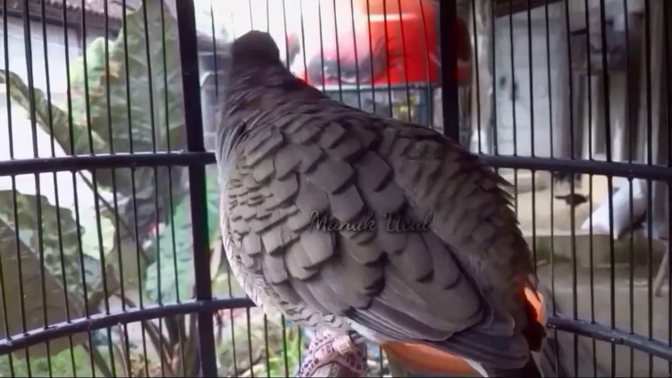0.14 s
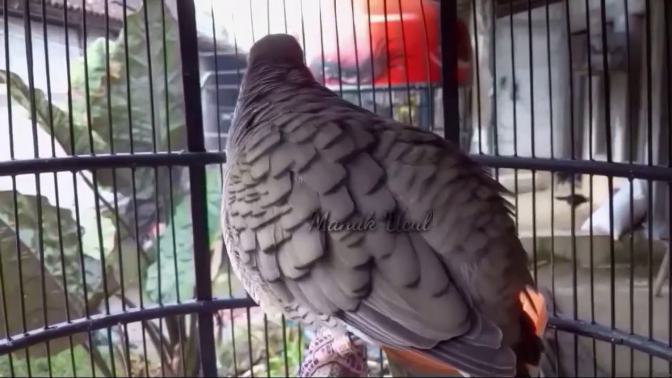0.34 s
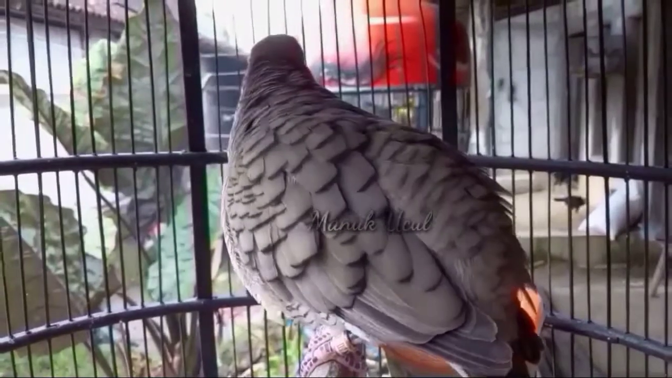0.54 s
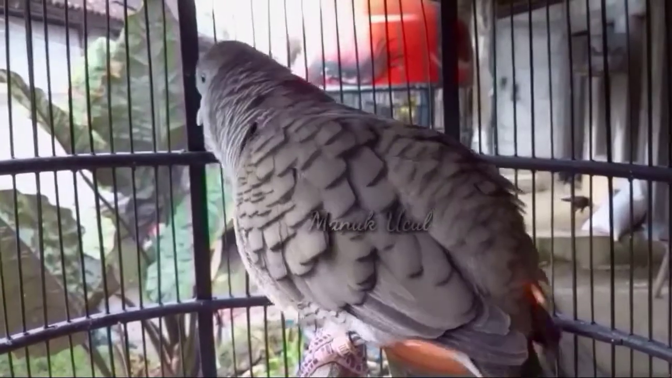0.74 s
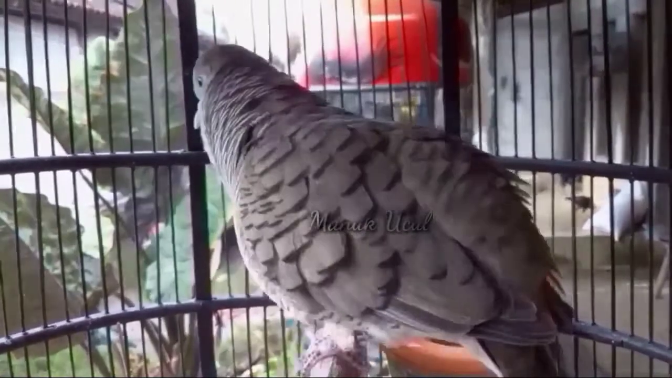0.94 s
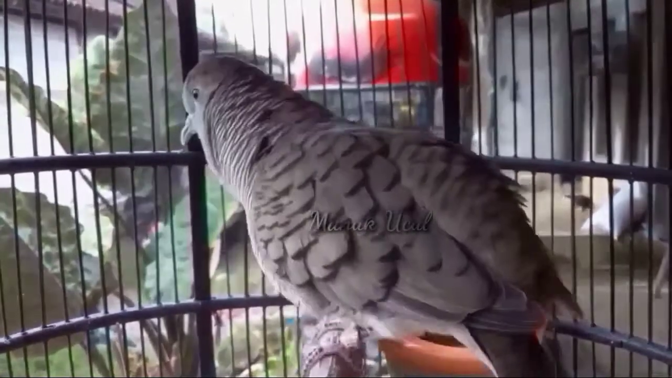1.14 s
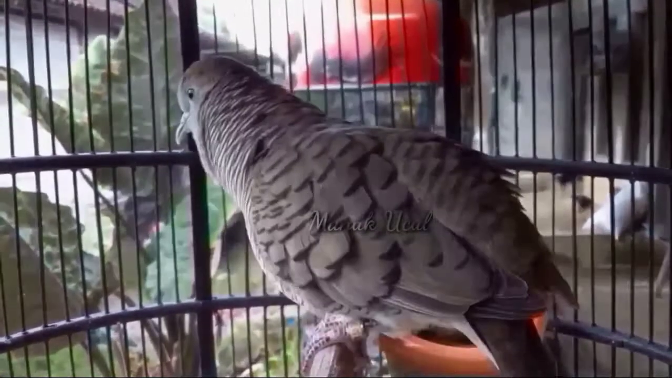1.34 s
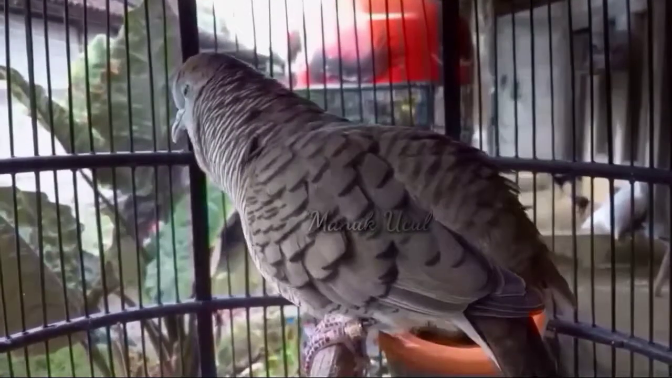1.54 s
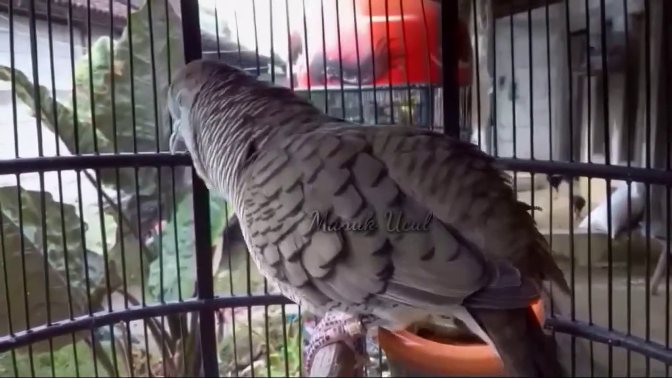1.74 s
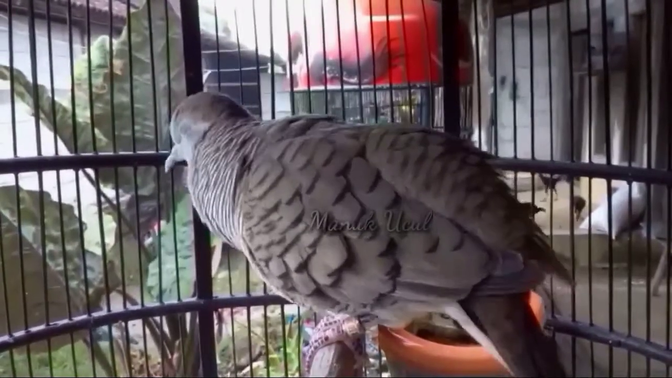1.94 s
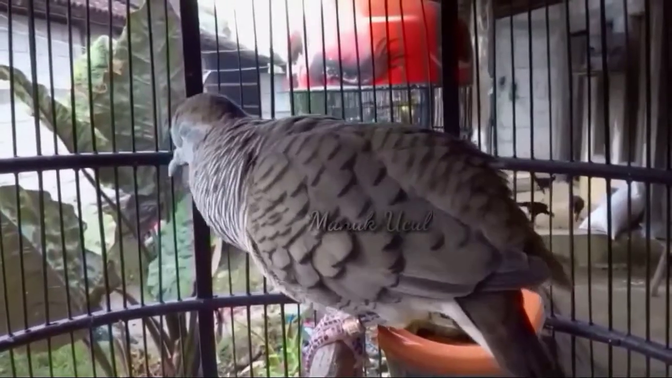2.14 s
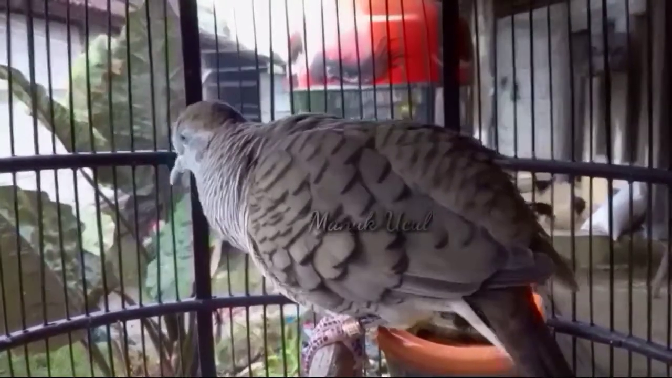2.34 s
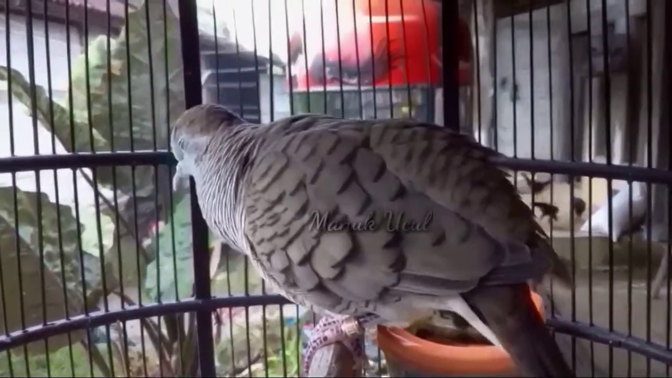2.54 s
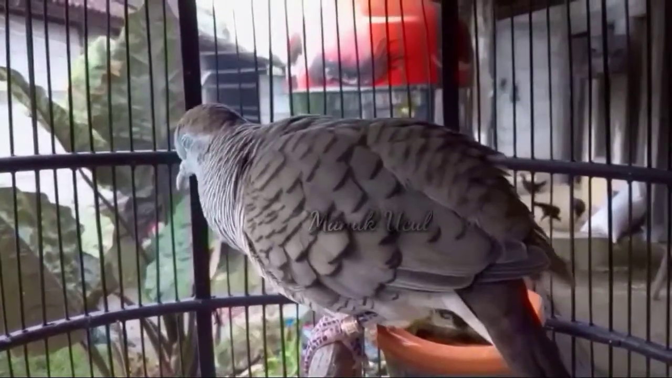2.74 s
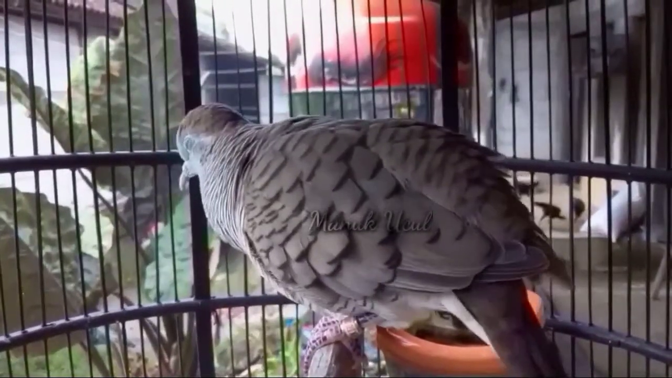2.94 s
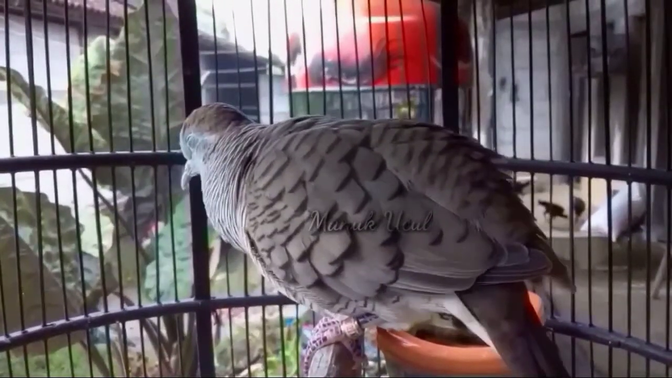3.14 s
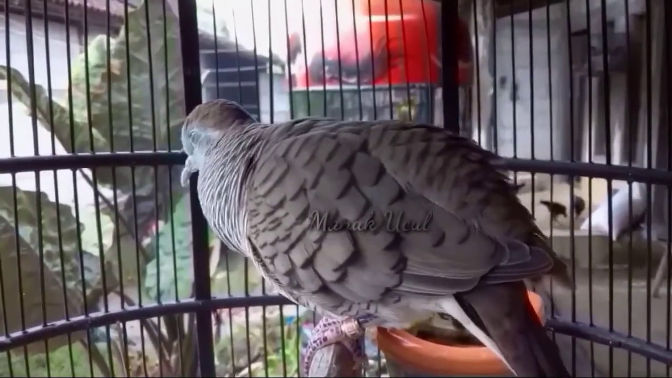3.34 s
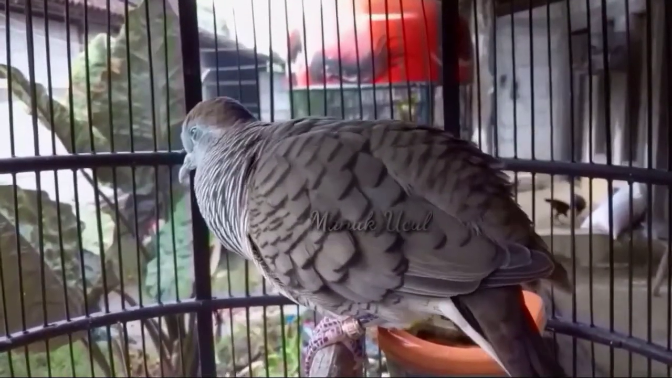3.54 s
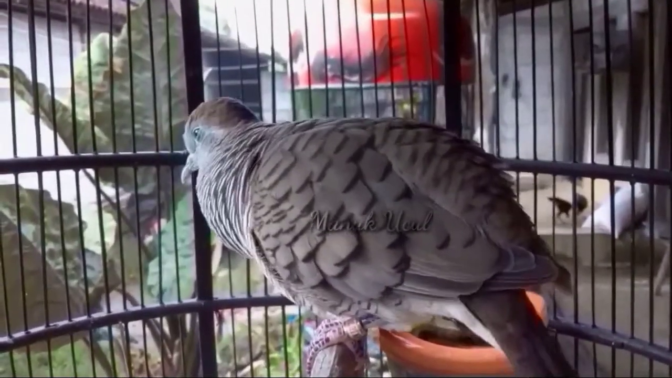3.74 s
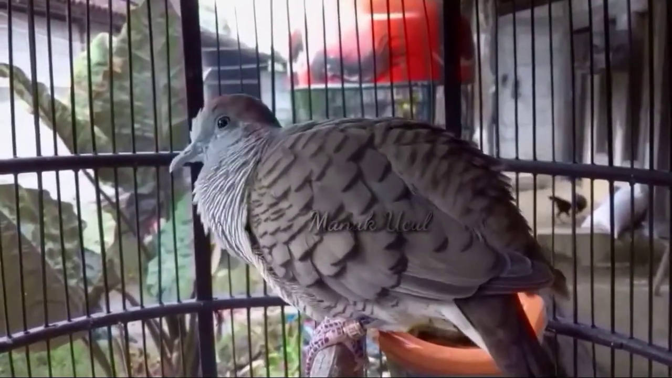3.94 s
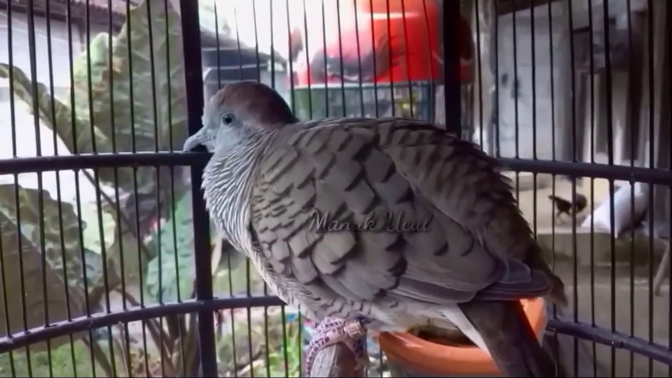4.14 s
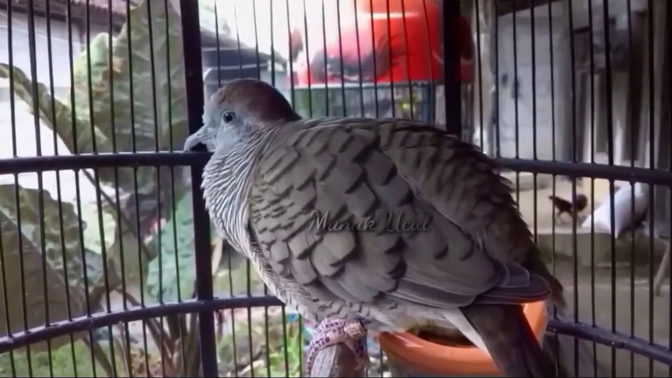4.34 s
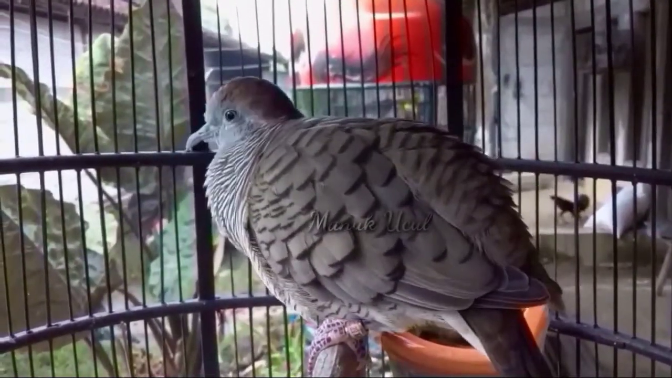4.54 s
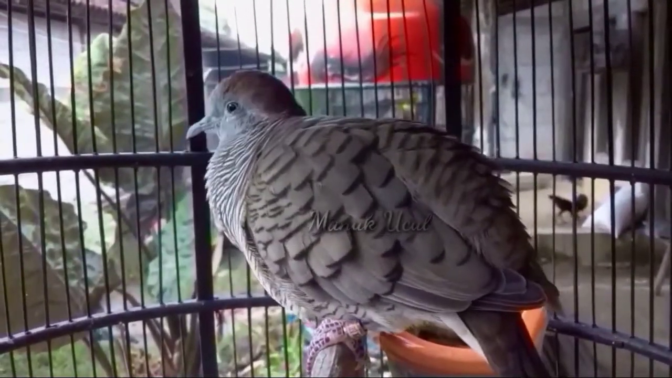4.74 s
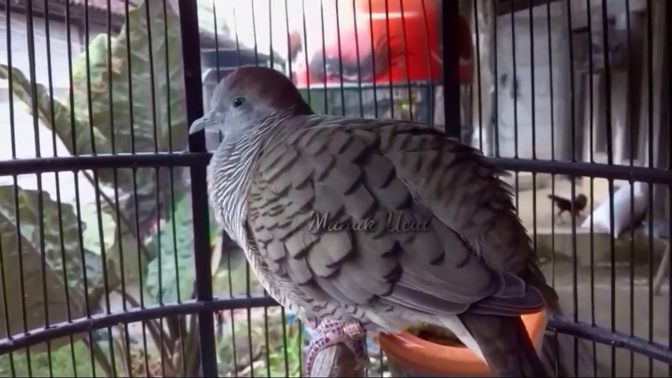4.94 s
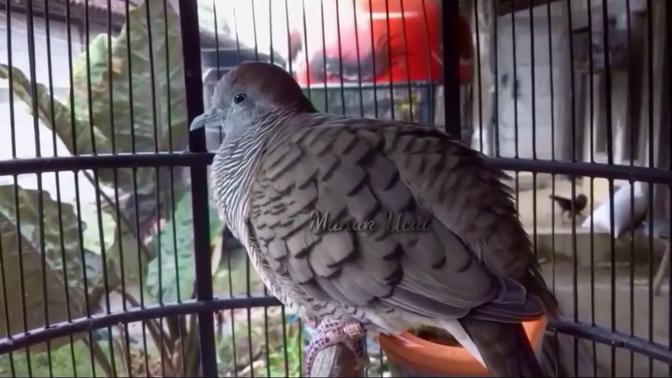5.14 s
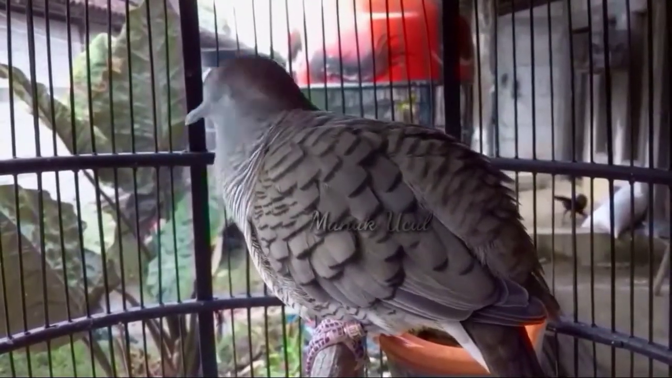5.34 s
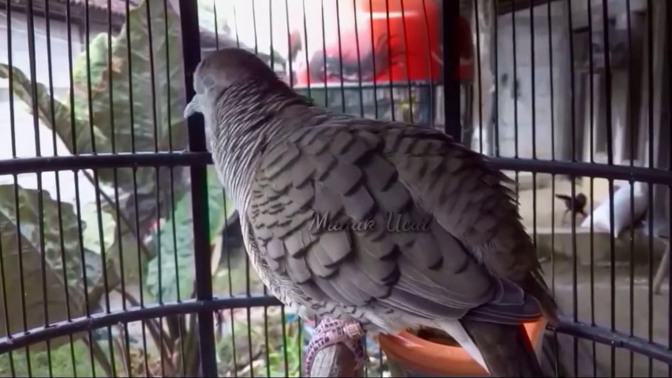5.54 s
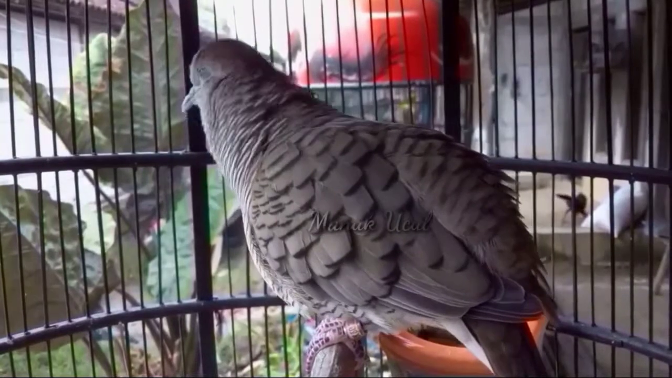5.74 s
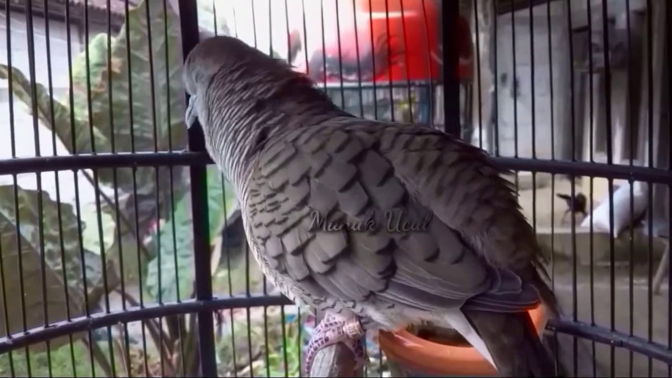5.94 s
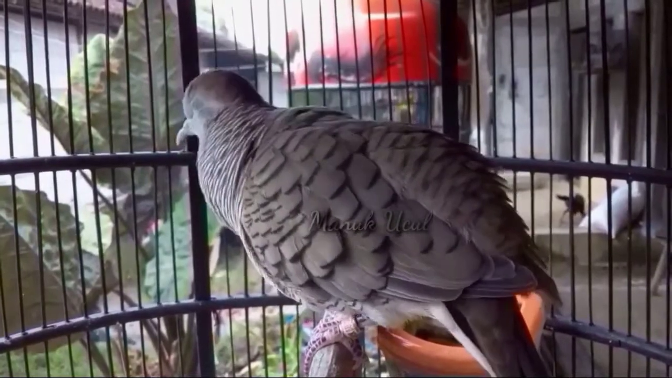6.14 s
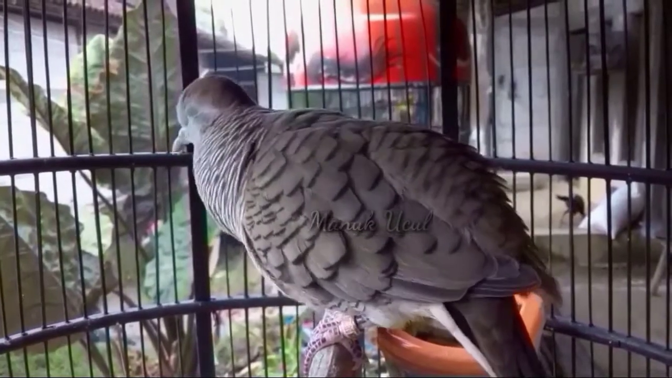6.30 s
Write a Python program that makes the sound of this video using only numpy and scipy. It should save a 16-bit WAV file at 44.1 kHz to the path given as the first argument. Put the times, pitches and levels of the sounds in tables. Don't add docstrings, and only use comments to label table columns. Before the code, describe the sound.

Low traffic rumble, thin insect hiss and faint chirping birds fill an outdoor yard, with small feather rustles and claw ticks close by. After two seconds a nearby dove croaks into a loud, sagging high coo, then four short lower notes and one long fading coo. A distant bird whistles repeatedly behind. Far doves call in the gap before the loud song restarts. The close microphone slightly overloads.

```python
import sys
import numpy as np
from scipy import signal
from scipy.fft import rfft, irfft
from scipy.io import wavfile
from scipy.ndimage import uniform_filter1d

SR = 44100
rng = np.random.default_rng(int(sys.argv[2]) if len(sys.argv) > 2 else 0)


def transcribe(signal):
    frames = np.atleast_2d(signal).T
    limited = np.clip(frames, -1, 1)
    pcm = np.round(limited * 32767).astype(np.int16)
    wavfile.write(sys.argv[1], SR, pcm)


def nominal_scale(level):
    x = np.asarray(level, float) / 20
    return 10 ** x


N = 285327
T = np.arange(N) / SR

# time in seconds, gain in dB.
GAIN = [(0, -16.5), (.23, -3), (.8, -0.5), (1.13, 3.5), (1.3, 0.5), (1.9, -0.5), (2.16, 1.5), (2.45, -8.5),
        (3.4, -7.5), (3.75, -2.5), (4.1, -12.5), (4.95, -11), (5.15, -4), (5.55, 0), (6.47, 0)]
# frequency in Hz, level in dB per Hz.
TRAFFIC = [(15, -41.5), (30, -22), (60, 0), (122, -1.5), (160, -4.5), (200, -10), (300, -16), (500, -41.5)]
# frequency in Hz, level in dB per Hz.
MOTOR = [(108, -25), (118, 0), (128, 0), (138, -25)]
# frequency in Hz, level in dB per Hz.
AIR = [(150, -14.5), (300, 5), (520, -4.5), (850, -6), (1500, -22), (2600, -23), (4000, -22), (6200, -33),
       (12500, -30.5), (15500, -38.5)]
# centre in Hz, width in Hz, level in dB.
HIGH_INSECTS = [(10300, 700, -2), (11100, 570, -6)]
# centre in Hz, width in Hz, level in dB.
LOW_INSECTS = [(4770, 420, 2.5), (5800, 300, -14.5)]
TRAFFIC_DB, HIGH_INSECT_DB, AIR_DB, LOW_INSECT_DB = -45.5, -64.5, -61, -63
MOTOR_DB, MIDDLE_AIR_DB = -8, 12
HIGH_FOLLOW, AIR_FOLLOW, LOW_FOLLOW = 0.68, 1.1, 0.97

# start in seconds, length in seconds, start pitch in Hz, level in dB.
CHIRPS = [(.154, 0.1, 3760, -58), (.488, .07, 3325, -59), (.648, 0.13, 4770, -65), (.94, 0.19, 4024, -59),
          (1.148, 0.096, 4010, -58.5), (1.664, .1, 3770, -59), (2.573, .13, 3620, -60),
          (2.831, 0.092, 3600, -62), (3.053, 0.14, 4520, -60.5), (3.549, 0.11, 4520, -63),
          (4.05, 0.13, 4500, -70), (4.55, 0.098, 4220, -72.5), (5.08, 0.088, 4240, -72),
          (5.603, .13, 4800, -62.5)]
# start in seconds, length in seconds, pitch in Hz, level in dB.
PEEPS = [(.08, .1, 3560, -72), (.257, 0.035, 5800, -70), (0.622, 0.053, 4660, -66),
         (1.373, 0.16, 3400, -68), (1.805, 0.17, 3500, -67.5), (2.034, .07, 2620, -59),
         (3.354, 0.083, 3735, -70.5), (3.749, 0.17, 3760, -69), (3.929, .12, 4890, -69.5)]
CHIRP_END_HZ = 2720

# start in seconds, length in seconds, start Hz, end Hz, level in dB.
FAR_NOTES = [(.26, .3, 715, 650, -60), (.44, .12, 1450, 1350, -68), (1.2, 0.094, 1500, 1150, -57),
             (1.963, 0.095, 1750, 2100, -55.5), (2.4, 0.13, 1300, 1500, -63.5), (2.9, .2, 1526, 1504, -64),
             (3.05, 0.38, 304, 357, -56), (3.76, 0.14, 1763, 1720, -66), (4.2, 0.084, 1247, 1017, -59),
             (4.73, 0.041, 1983, 2010, -64), (6.235, 0.035, 983, 820, -41)]
# start in seconds, length in seconds, start Hz, end Hz, level in dB.
HONKS = [(.7, .12, 790, 790, -61), (.855, .045, 1090, 1040, -48.5), (1.07, .04, 1000, 1030, -44.5),
         (1.3, .13, 840, 810, -59), (1.56, .29, 817, 770, -64.5), (4.06, .04, 960, 1000, -59),
         (5.9, .18, 600, 581, -56.5)]
# start in seconds, length in seconds, pitch in Hz, level in dB.
NEIGHBOUR = [(4.47, .15, 830, -57.5), (4.71, .14, 830, -61), (5.01, .14, 845, -58), (5.21, .1, 840, -56),
             (5.43, .1, 826, -50), (5.66, .13, 828, -46), (5.93, .09, 815, -48), (6.07, .14, 805, -47.5),
             (6.21, .1, 790, -46), (5.8, .16, 1285, -61), (5.33, .1, 1050, -63), (4.5, .06, 975, -59),
             (4.56, .11, 1045, -55.5), (4.69, .13, 1010, -56), (4.84, .09, 1010, -62)]
NEIGHBOUR_SAG_PER_S, CLEAR_OCTAVE_DB, HONK_OCTAVE_DB = 0.09, -29, -12

# start in seconds, length in seconds, level in dB.
RUSTLES = [(.86, 0.039, -60.5), (1.06, 0.029, -53), (1.209, .105, -47), (1.33, 0.012, -52),
           (1.5, 0.022, -54), (1.94, .12, -53.5), (5.41, 0.11, -61), (5.75, .08, -64)]
# frequency in Hz, level in dB per Hz.
FEATHER = [(410, -53), (700, -13), (1060, -1), (1170, -8), (1280, -5.5), (1830, -8.5), (4060, -15.5),
           (7040, -11), (15000, -30.5)]
# start in seconds, peak in dB, ring in Hz.
TICKS = [(0.3954, -49.5, 10300), (1.2173, -34.5, 7150), (1.299, -39.5, 7100), (1.3835, -50, 11100),
         (1.5007, -41, 6880), (1.7764, -50.5, 11060), (1.948, -41, 7260), (2.0527, -39, 7720),
         (4.918, -61, 10300), (5.1363, -55, 10300), (5.3342, -46.5, 11100), (5.6282, -48, 10700),
         (5.7662, -43.5, 10800), (6.2421, -38, 7740)]

# start in seconds, length in seconds, level in dB.
WHISTLES = [(1.97, .21, -47), (2.4, .1, -55), (2.52, .16, -50), (2.71, .2, -50), (2.97, .2, -49.5),
            (3.23, .21, -49), (3.51, .17, -44), (3.78, .16, -45.5), (4.06, .15, -48.5), (4.35, .15, -48)]
WHISTLE_HZ, TIRING_HZ_PER_S = 1313, 14

# start in seconds, length in seconds, level in dB.
CROAKS = [
    (2.088, .004, -28),
    (2.0965, .016, -7),
    (2.6275, .007, -12),
    (2.826, .007, -15),
    (3.0275, .007, -18),
    (3.2355, .006, -22),
    (3.4645, .011, -16),
    (6.2885, .017, -7),
]
CROAK_HZ, THROAT_HZ, THROAT_T60_S = 290.7, 1005, 0.018

# multiple of the pitch, level in dB.
VOICE = [(1, 0), (2, -40.5), (3, -44), (4, -57.5), (5, -57), (6, -60.5), (7, -57), (8, -63.5), (9, -61.5),
         (10, -67), (11, -72.5), (12, -77)]
# lift at start in dB, at end in dB.
BRIGHTNESS = [(15.5, 0.5), (22, -9), (20.5, -9), (18.5, -8.5), (18.5, -12.5), (23, -10), (12, -1)]
# time from the break in seconds, pitch in Hz, level in dB.
LEAD_IN = [(-.064, 765, -32), (-.053, 782, -10), (-.028, 809, -5.4), (-.02, 814, -7), (-.011, 877, -4.2),
           (-.007, 882, -7.3), (-.002, 900, -9)]
# time in seconds, pitch in Hz, level in dB.
HIGH_NOTES = [
    [(2.173, 1025, -1.4), (2.187, 1045, -.5), (2.215, 1042, -2.1), (2.222, 1035, -4), (2.285, 1009, -4.9),
     (2.36, 966, -9), (2.37, 960, -5.6), (2.398, 940, -7), (2.405, 900, -24)],
    [(6.362, 990, -2.7), (6.371, 1008, -4.2), (6.39, 1016, -3.3), (6.405, 1008, -6.3), (6.418, 1011, -3.9),
     (6.428, 1011, -5), (6.438, 1008, -4.1), (6.452, 999, -6.3), (6.48, 997, -4.5)],
]
# start in seconds, length in seconds, aimed pitch in Hz, effort in dB.
LOW_NOTES = [
    (2.6326, .059, 854, -.5),
    (2.8287, .065, 846, -1.6),
    (3.0307, .07, 839, -1.7),
    (3.2386, .084, 831, -.8),
    (3.468, .466, 812, -2.2),
]
BEAK_HZ, BEAK_WIDTH_HZ, BEAK_DB = 5800, 380, 12
SETTLE_S, RAGGED_DB = .028, 4
SWELL_S, FADE_DB_PER_S, FADE_S, RELEASE_S = .0577, 29, .37, .022
SCOOP_HZ, SCOOP_S, REST_HZ, SAG_S, DROP_S = 156, .013, 737, .335, .01
THROB_HZ, THROB_DB, THROB_PEAK_S, THROB_FADE_S = 16.3, .9, .093, .22

# delay in seconds, level in dB.
ECHOES = [(.013, -30.5), (.031, -29.5), (.06, -31), (.098, -36)]


def level(x, db):
    return x * nominal_scale(db) / np.sqrt(np.mean(x ** 2))


def walk(rate_hz):
    hold = int(SR / rate_hz)
    steps = np.repeat(rng.standard_normal(N // hold + 1), hold)
    return 1.3 * uniform_filter1d(uniform_filter1d(steps, hold), hold)[:N]


def noise(points, size=N):
    hz, db = np.transpose(points)
    f = np.maximum(np.fft.rfftfreq(size, 1 / SR), 1)
    colour = nominal_scale(np.interp(np.log(f), np.log(hz), db, -90, -90))
    return level(irfft(rfft(rng.standard_normal(size)) * colour, size), 0)


def band(x, lo_hz, hi_hz):
    return signal.sosfilt(signal.butter(2, [lo_hz, hi_hz], "band", fs=SR, output="sos"), x)


def add(out, start_s, x):
    i = int(start_s * SR)
    out[i:i + len(x)] += x[:N - i]


def swell(length_s, edge):
    u = np.linspace(0, 1, int(length_s * SR))
    return u, signal.windows.tukey(len(u), np.clip(edge, 0, 1))


def echo(x, t60_s, gap_s):
    t = np.arange(int(t60_s * SR)) / SR
    colour = [(100, -0.5), (1500, -7.0), (6000, -7.5), (15000, -22.5)]
    walls = noise(colour, size=len(t)) * nominal_scale(-60 * t / t60_s) * (t > gap_s)
    return signal.fftconvolve(x, walls / np.sqrt(np.sum(walls ** 2)) * nominal_scale(4))[:N]


def insects(bands):
    out = np.zeros(N)
    for hz, w, db in bands:
        hiss = noise([(hz - 2.3 * w, -25), (hz - w / 2, 0), (hz + w / 2, 0), (hz + 2.0 * w, -25)])
        out += nominal_scale(db + 1.7 * walk(14)) * hiss
    return out


def yard():
    gain_db = np.interp(T, *np.transpose(GAIN))
    traffic_db = TRAFFIC_DB + gain_db
    air_db = AIR_DB + AIR_FOLLOW * gain_db
    high_db = HIGH_INSECT_DB + HIGH_FOLLOW * gain_db
    low_db = LOW_INSECT_DB + LOW_FOLLOW * gain_db + 1.9 * walk(4.5)
    air = noise(AIR)
    body, middle = band(air, 100, 1900), band(air, 1800, 6000)
    top = air - body - middle
    air = body * nominal_scale(air_db + 8.0 + 3.1 * walk(9.2))
    air += middle * nominal_scale(low_db + MIDDLE_AIR_DB + 2.5 * walk(8))
    air += top * nominal_scale(high_db + 16 + 0.5 * walk(11))
    bugs = insects(HIGH_INSECTS) * nominal_scale(high_db)
    bugs += insects(LOW_INSECTS) * nominal_scale(low_db - 1 + 2.0 * walk(9))
    rumble = noise(TRAFFIC) + nominal_scale(MOTOR_DB) * noise(MOTOR)
    return rumble * nominal_scale(traffic_db + 2.0 + 1.1 * walk(6.8)) + air + bugs


def chirpers():
    out, flutter = np.zeros(N), walk(300)
    notes = [(*row, CHIRP_END_HZ) for row in CHIRPS] + [(*row, row[2]) for row in PEEPS]
    for start_s, length_s, hz0, db, hz1 in notes:
        u, env = swell(length_s, 0.42)
        hz = (hz0 + (hz1 - hz0) * u) * (1 + .028 * flutter[int(start_s * SR):][:len(u)])
        add(out, start_s, nominal_scale(db) * env * np.sin(2 * np.pi * np.cumsum(hz) / SR))
    return np.sqrt(2) * out


def far_birds():
    out, waver = np.zeros(N), walk(70)
    notes = [(s, length_s, hz, hz * (1 - NEIGHBOUR_SAG_PER_S * length_s), db, CLEAR_OCTAVE_DB)
             for s, length_s, hz, db in NEIGHBOUR]
    notes += [(*row, HONK_OCTAVE_DB) for row in HONKS]
    notes += [(*row, CLEAR_OCTAVE_DB) for row in FAR_NOTES]
    for start_s, length_s, hz0, hz1, db, octave_db in notes:
        u, env = swell(length_s, 0.2)
        hz = (hz0 + (hz1 - hz0) * u) * (1 + .013 * waver[int(start_s * SR):][:len(u)])
        phase = 2 * np.pi * np.cumsum(hz) / SR
        add(out, start_s, nominal_scale(db) * env * (np.sin(phase) + nominal_scale(octave_db) * np.sin(2 * phase)))
    return np.sqrt(2) * out * nominal_scale(3.2 * walk(45))


def perch():
    out, t = np.zeros(N), np.arange(400) / SR
    brush = noise(FEATHER)
    low = band(brush, 300, 4100)
    high = brush - low
    brush = low * nominal_scale(2 * walk(60) + 2 * walk(400)) + high * nominal_scale(2.5 * walk(70) + 2.5 * walk(500))
    for start_s, length_s, db in RUSTLES:
        u, env = swell(1.3 * length_s, .55)
        add(out, start_s - 0.11 * length_s, nominal_scale(db) * env * brush[int(start_s * SR):][:len(u)])
    for start_s, db, hz in TICKS:
        ring = 1.2 * np.sin(2 * np.pi * hz * t) * nominal_scale(-60 * t / .008)
        scrape = 0.76 * noise(FEATHER, size=len(t)) * nominal_scale(-60 * t / .005)
        add(out, start_s, nominal_scale(db) * (ring + scrape))
    return out


def whistler():
    out = np.zeros(N)
    for start_s, length_s, db in WHISTLES:
        u, env = swell(length_s, 0.29)
        hz = WHISTLE_HZ - TIRING_HZ_PER_S * (start_s - WHISTLES[0][0])
        glide = 1 - .2 * np.exp(-u / .17) - .03 * u ** 6
        phase = 2 * np.pi * np.cumsum(hz * glide) / SR
        grow = np.clip(.12 + ((u - .1) / .25) ** 2, 0, 1)
        add(out, start_s, nominal_scale(db) * env * grow * (np.sin(phase) + nominal_scale(-34) * np.sin(2 * phase)))
    return np.sqrt(2) * out * nominal_scale(2.0 * walk(40))


def croaks():
    out, t = np.zeros(N), np.arange(1500) / SR
    chance = rng.standard_normal((len(CROAKS), 8, 2))
    onset = 1 - np.exp(-(t / 0.0012) ** 2)
    puff = nominal_scale(-16) * np.sin(2 * np.pi * 430 * t) * nominal_scale(-60 * t / 0.019)
    for (start_s, length_s, db), draws in zip(CROAKS, chance):
        for k, (late, detune) in enumerate(draws):
            at_s = (k + 0.11 * late) / CROAK_HZ
            grow = np.clip(.35 + 1.3 * at_s / length_s, 0, 1)
            grow *= np.clip((length_s - at_s) * CROAK_HZ + 1, 0, 1)
            ring = np.sin(2 * np.pi * THROAT_HZ * (1 + .04 * detune) * t) * nominal_scale(-60 * t / THROAT_T60_S)
            add(out, start_s + at_s, nominal_scale(db + 2.5) * grow * (ring + puff) * onset)
    return out


def high_note(held):
    break_s = held[0][0]
    s, hz, db = np.transpose([(break_s + s, hz, db) for s, hz, db in LEAD_IN] + held)
    on = (T >= s[0]) & (T < s[-1])
    pitch_hz = uniform_filter1d(np.interp(T[on], s, hz), size=60)
    loud = uniform_filter1d(np.interp(T[on], s, nominal_scale(db)), size=60)
    return on, pitch_hz, loud * np.clip((s[-1] - T[on]) / .002, 0, 1)


def low_note(start_s, length_s, hz, db):
    on = (T >= start_s) & (T < start_s + length_s)
    since_s, left_s = T[on] - start_s, start_s + length_s - T[on]
    effort_hz = (hz - REST_HZ) * np.exp(-since_s / SAG_S) * (1 - np.exp(-left_s / DROP_S))
    pitch_hz = REST_HZ + effort_hz - SCOOP_HZ * np.exp(-since_s / SCOOP_S)
    throb_db = THROB_DB * np.cos(2 * np.pi * THROB_HZ * (since_s - THROB_PEAK_S))
    throb_db *= np.clip(since_s / THROB_PEAK_S, 0, 1) ** 4 * 1.6 * np.exp(-since_s / THROB_FADE_S)
    release = np.sin(np.pi / 2 * np.clip(left_s / RELEASE_S, 0, 1)) ** 1.35
    loud = nominal_scale(db - FADE_DB_PER_S * np.minimum(since_s, FADE_S) + throb_db)
    return on, pitch_hz, loud * (1 - np.exp(-since_s / SWELL_S)) * release


def dove():
    out = np.zeros(N)
    breath = nominal_scale(-32.5) * noise([(450, -35.5), (700, -3.0), (950, 7.0), (1150, -10), (1500, -22.5),
                                 (2500, -43.0)])
    tremble = nominal_scale(.4 * walk(90))
    notes = [high_note(HIGH_NOTES[0])] + [low_note(*row) for row in LOW_NOTES] + [high_note(HIGH_NOTES[1])]
    for (on, pitch_hz, loud), (start_db, end_db) in zip(notes, BRIGHTNESS):
        since_s = T[on] - T[on][0]
        phase = 2 * np.pi * np.cumsum(pitch_hz) / SR
        tone = np.sin(phase) + breath[on]
        settle = np.exp(-since_s / SETTLE_S)
        bright_db = end_db + (start_db - end_db) * settle
        for k, over_db in VOICE[1:]:
            beak_db = BEAK_DB * np.exp(-((k * pitch_hz - BEAK_HZ) / BEAK_WIDTH_HZ) ** 2)
            ragged_db = RAGGED_DB * min(k / 6, 1) * (.3 + settle) * walk(250)[on]
            lift_db = beak_db + bright_db * min((k - 2) / 4, 1) + 2.2 * walk(40)[on] + ragged_db
            tone = tone + nominal_scale(over_db + lift_db) * np.sin(k * phase + k * k)
        out[on] = np.sqrt(2) * loud * tremble[on] * tone * np.clip(since_s / .002, 0, 1)
    return out


def scene():
    background = yard()
    small, far = chirpers(), far_birds()
    near, whistle = perch(), whistler()
    near = near + croaks() + dove()
    walls = sum(nominal_scale(db) * np.concatenate([np.zeros(int(s * SR)), near])[:N] for s, db in ECHOES)
    wet = walls + nominal_scale(-43) * echo(near, .4, .03)
    far = far + nominal_scale(-7) * echo(far * nominal_scale(3 * walk(60)), .4, .008)
    small = nominal_scale(-.5) * small + nominal_scale(-4) * echo(small, .5, .003)
    whistle = whistle + nominal_scale(-19) * echo(whistle, .45, .02)
    mix = near + wet + nominal_scale(2.0) * whistle + nominal_scale(-2.0) * far + nominal_scale(-1.0) * small + background
    return mix[None]


def roll_off(x):
    return signal.sosfilt(signal.butter(12, 15700, fs=SR, output="sos"), x)


def record(dry):
    flat = np.clip(dry, -.98, .98)
    return roll_off(flat)


dry = scene()
out = record(dry)
transcribe(out)
```